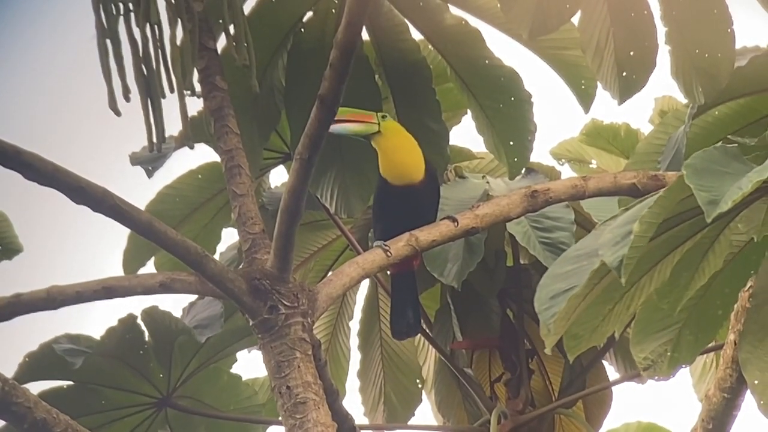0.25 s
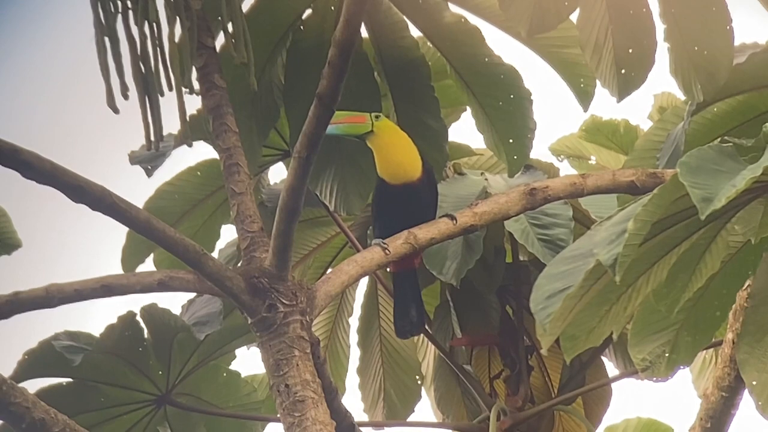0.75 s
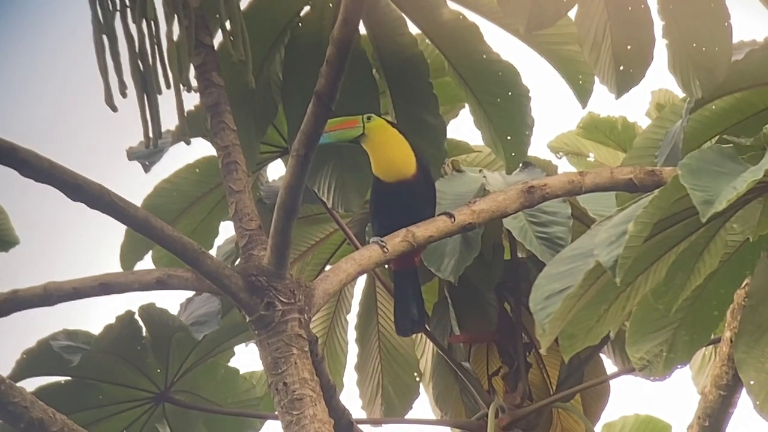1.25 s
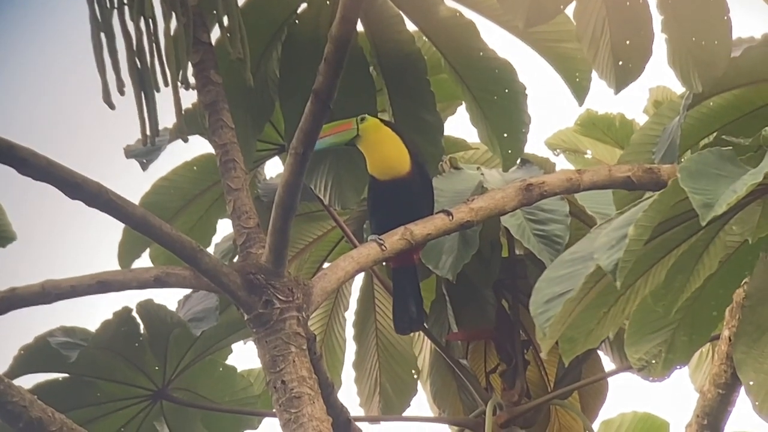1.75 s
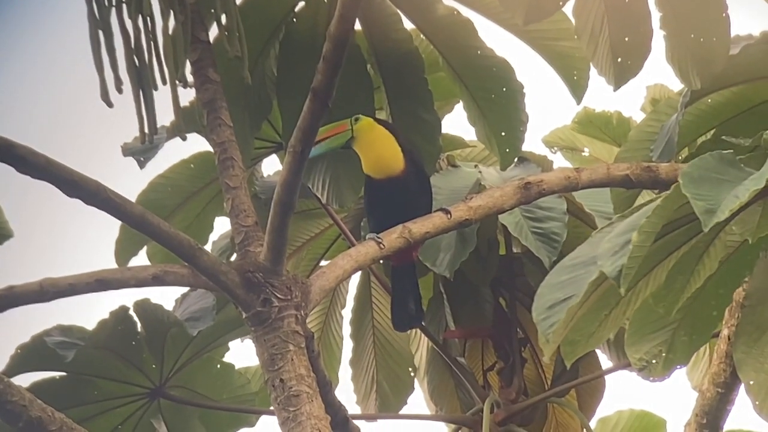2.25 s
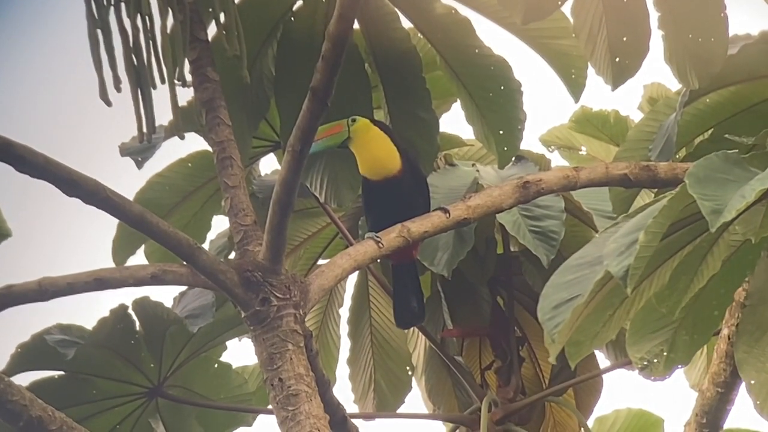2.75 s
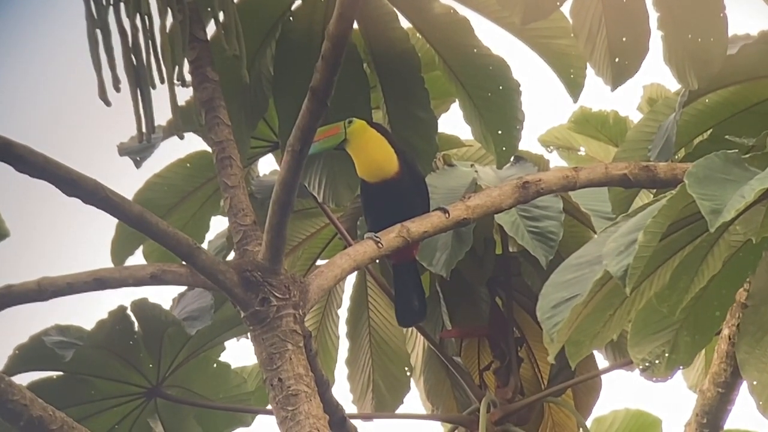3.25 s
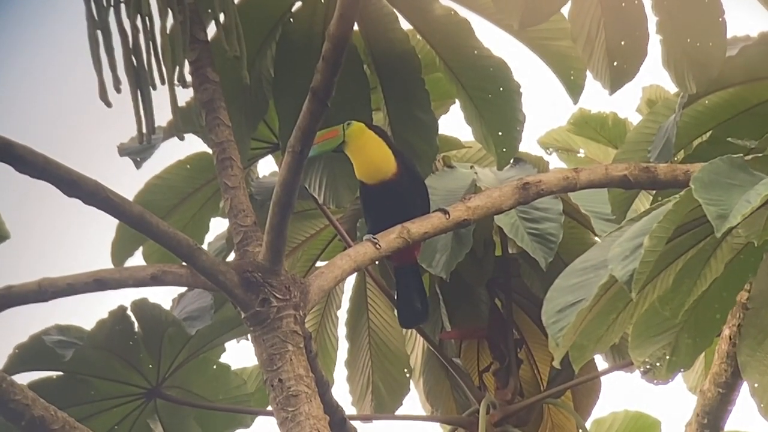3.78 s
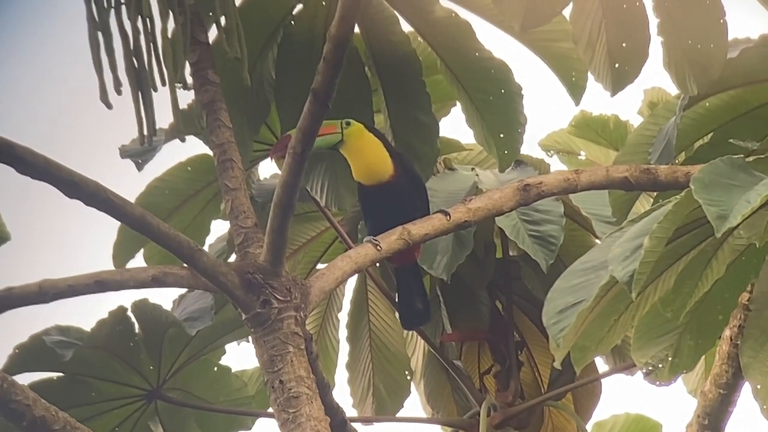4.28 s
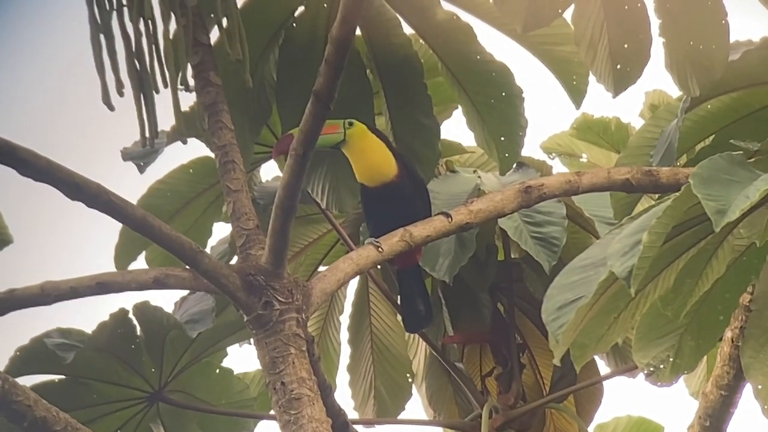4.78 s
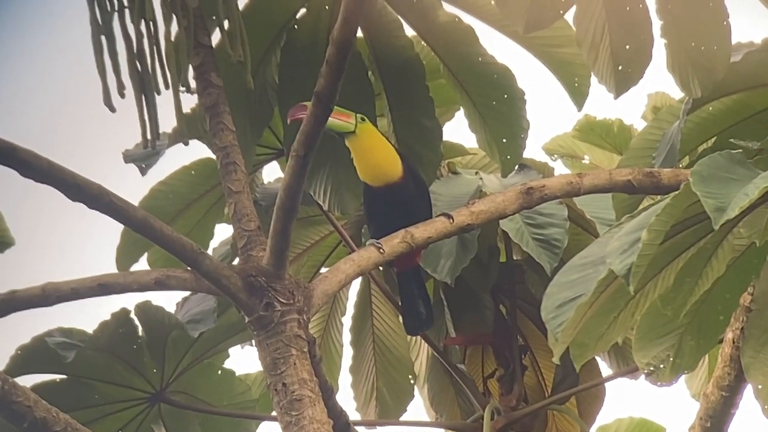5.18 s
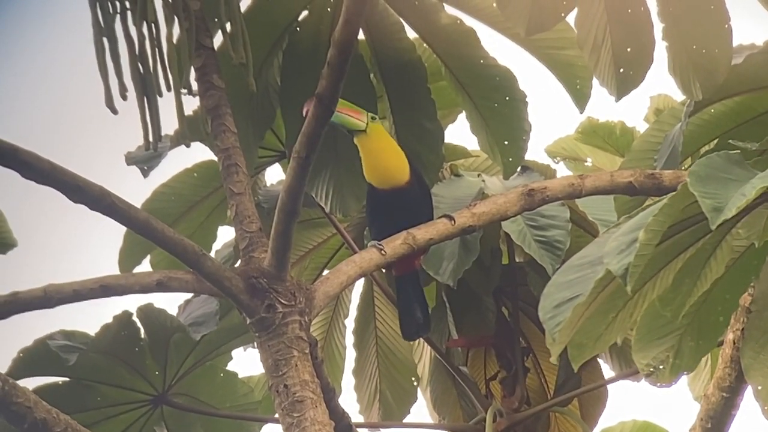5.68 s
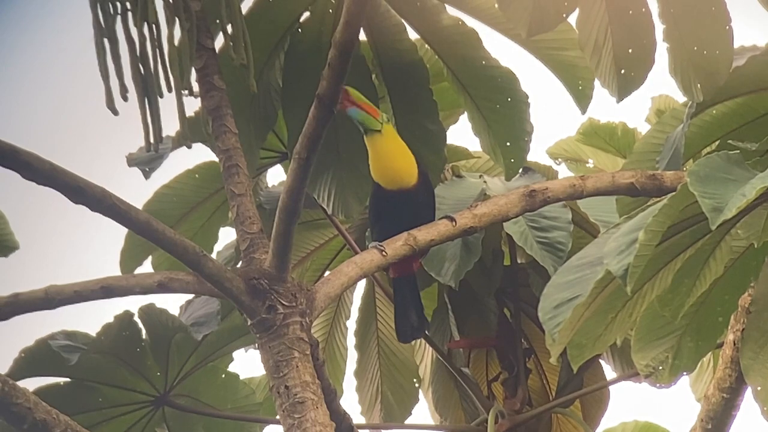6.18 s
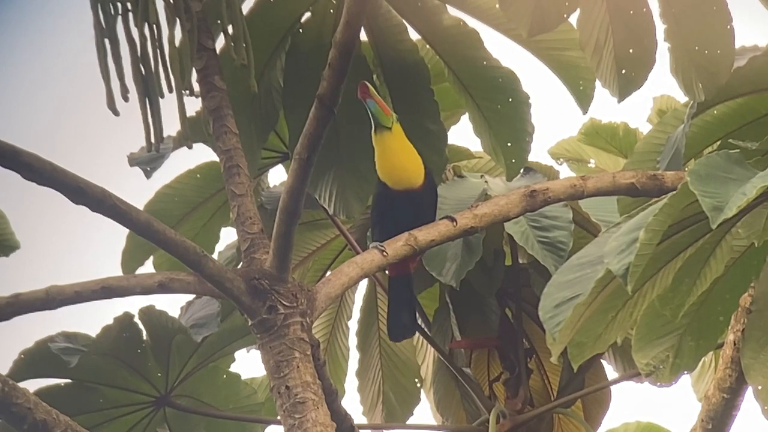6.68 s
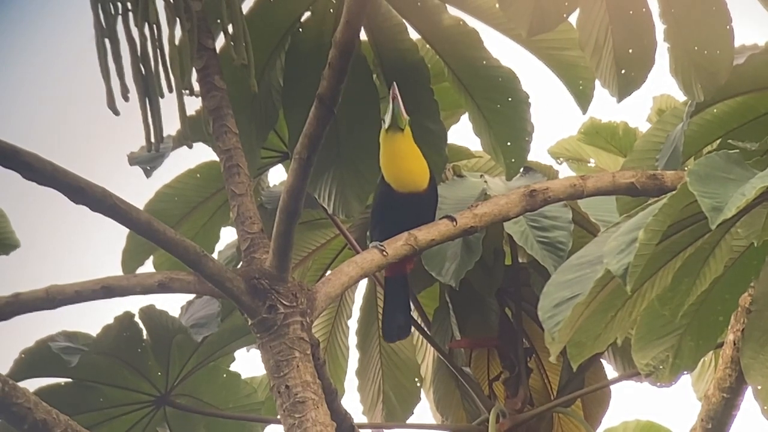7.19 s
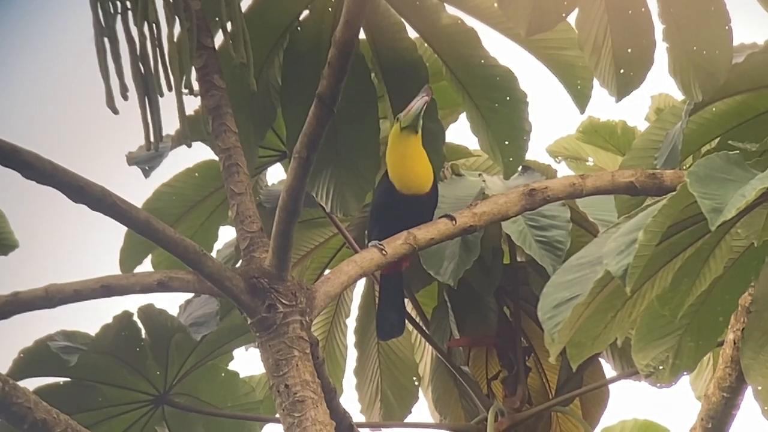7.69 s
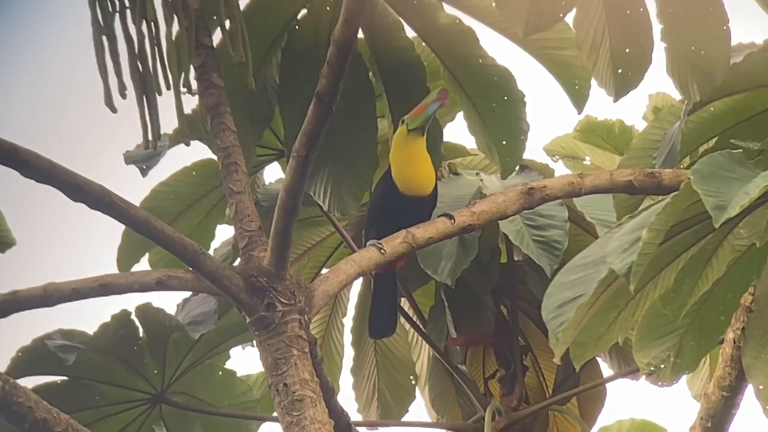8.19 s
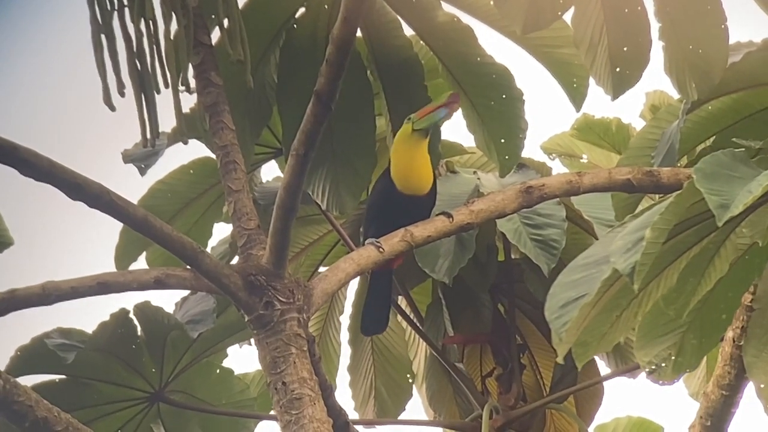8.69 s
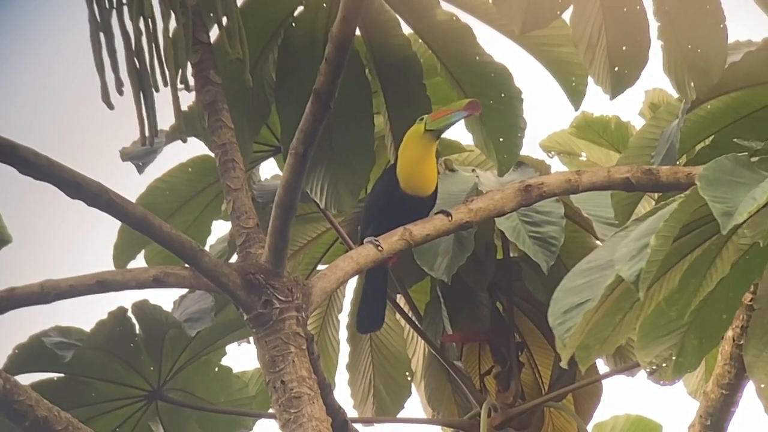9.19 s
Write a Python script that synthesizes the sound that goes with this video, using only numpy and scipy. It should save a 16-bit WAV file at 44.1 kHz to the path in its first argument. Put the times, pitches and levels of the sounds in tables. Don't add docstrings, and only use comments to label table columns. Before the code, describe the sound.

Outdoors in rainforest, a constant grainy insect hiss surrounds a regular series of dry, throaty bird croaks, each a quick burst of pulses. A second, deeper bird replies, blurred by distance, then falls silent in the last few seconds. Very high katydid chirps shimmer wide in the stereo image. Wind thuds gently on the handheld microphone, with small knocks mid-way, faint leaf brushes later and one tiny rising whistle near the end.

```python
import sys
import numpy as np
from scipy import signal
from scipy.fft import rfft, irfft, next_fast_len
from scipy.io import wavfile
from scipy.ndimage import uniform_filter1d

SR = 44100
rng = np.random.default_rng(int(sys.argv[2]) if len(sys.argv) > 2 else 0)


def pcm_store(signal):
    levels = np.round(np.clip(np.atleast_2d(signal), -1, 1) * 32767)
    wavfile.write(sys.argv[1], SR, levels.astype(np.int16).T)


def nominal_scale(level):
    x = np.asarray(level, float) / 20
    return 10 ** x


N = 416304

# frequency in Hz, density in dB per Hz.
HISS_MID = [(88, -11), (160, -9), (340, -11), (700, -14), (1200, -18), (2510, 2.5), (3690, -22.5),
            (5240, -25.5), (6840, -14), (7250, -24), (7450, -35), (9400, -43.5), (12300, -62.5),
            (12900, -65.5)]
# frequency in Hz, density in dB per Hz.
HISS_SIDE = [(88, -35), (150, -4.5), (590, -0.5), (1470, 0), (1960, -6), (2970, -15.5), (3400, -21),
             (4200, -53), (7300, -35), (8100, -23.5), (9700, -27.5), (11000, -51.5), (13700, -33.5),
             (14600, -64)]
# time in seconds, level in dB.
CHORUS = [(0, 0.5), (1.5, 0.5), (3, 1.5), (4.5, 0.5), (6, 1), (7.5, 0.5), (9.44, 0)]
# pitch in Hz, width in Hz, level in dB, chirps per second.
CRICKETS = [
    (6850, 95, -71.5, 45),
    (6520, 80, -77.5, 36),
    (7360, 66, -90.5, 19),
]
# start in seconds, length in seconds, first level in dB, last level in dB.
KATYDID = [
    (-.01, 2.64, -57, -54),
    (3.191, 1.343, -57, -56),
    (4.905, 1.008, -55, -53),
    (6.714, 0, -58, -58),
    (7.224, 1.701, -52, -50),
    (9.306, 0, -55, -55),
]
# time in seconds, level in dB.
GUSTS = [(0, -70), (.63, -67), (.9, -56), (1.5, -58), (2.3, -52), (2.52, -46.5), (2.73, -59.5),
         (3.36, -54.5), (3.8, -63.5), (4.6, -53), (5.6, -60), (6.3, -54), (6.72, -44), (7, -54),
         (7.35, -49), (7.85, -58), (9.03, -51), (9.44, -56.5)]
# time in seconds, peak in dB, pitch in Hz.
PUFFS = [(1.943, -39.5, 69), (2.098, -41, 92), (2.412, -34, 110), (2.452, -28.5, 73), (5.062, -41, 68.6),
         (6.282, -34, 64.6), (6.538, -34.5, 80.7), (6.595, -28.5, 77), (6.769, -37, 48.4), (6.813, -28, 70),
         (7.191, -36.5, 56.5), (7.691, -26.5, 61.3), (8.588, -35.5, 70)]
# start in seconds, peak in dB, opening pitch in Hz, swell in dB.
CROAKS = [(0.3025, -28, 1852, 14), (0.9638, -29, 1820, 5), (1.6238, -29.5, 1800, 5),
          (2.2893, -31.5, 1840, 3.5), (2.9503, -28.5, 1890, 9), (3.6037, -29.5, 1865, 8),
          (4.2369, -27, 1840, 10.5), (4.9385, -29, 1843, 7.5), (5.5665, -28.5, 1834, 8),
          (6.1937, -29, 1822, 7.5), (6.7965, -28.5, 1842, 5.5), (7.4257, -26.5, 1875, 10),
          (8.0381, -26, 1794, 9), (8.7234, -26, 1810, 11), (9.35, -25, 1783, 12)]
# length in seconds, slow gaps, quick gaps, index of the gap that stumbles, beats lost there.
RHYTHM = [(.0926, 2, 5, 0, 0), (.117, 5, 1, 0, 0), (.1225, 5, 0, 0, 2), (.123, 4, 3, 0, 1),
          (.113, 3, 5, 0, 0), (.1112, 3, 4, 2, 1), (.122, 5, 1, 1, 1), (.111, 5, 1, 0, 0),
          (.1235, 4, 3, 0, 1), (.1133, 5, 1, 0, 0), (.132, 3, 7, 0, 0), (.1117, 3, 5, 0, 0),
          (.1222, 5, 2, 0, 0), (.1237, 3, 4, 0, 2), (.125, 5, 2, 0, 0)]
# time in seconds, octave in dB re peak, bill ring in dB re peak.
HEAD_TURNS = [(0.3, -17, -13.5), (1.0, -14.5, -16.5), (3.6, -15.5, -21), (4.4, -15, -21), (5.6, -16, -12),
              (6.8, -18.5, -14.5), (7.501, -23.5, -16), (9.4, -24, -13.5)]
# time of the loudest pulse in seconds, peak in dB, gap between pulses in seconds,
# swell in dB, after-beat step in dB.
FAR_CALLS = [(0.5064, -28, .0185, 8, -6), (1.1776, -27.5, .0195, 6, -17), (1.8152, -29.5, .013, 2.5, -15),
             (2.507, -33, .019, 3, -4), (3.2166, -27.5, .0228, 6.5, -20), (3.914, -33, .025, 6.5, -4),
             (4.6549, -25, .017, 9, -3), (5.3611, -24, .0215, 8, -20), (6.0586, -31.5, .022, .5, -20),
             (6.767, -28, .025, 6, -20)]
# time in seconds, peak in dB, pitch in Hz.
KNOCKS = [(4.267, -49.5, 149), (4.331, -49, 230), (4.417, -46, 153), (4.435, -48, 315), (4.471, -42, 477),
          (4.479, -38, 146), (4.519, -56, 380), (4.557, -47.5, 496), (5.339, -43, 178), (6.124, -47, 197),
          (6.539, -41.5, 159), (6.604, -44, 160), (6.847, -45.5, 150), (7.271, -43.5, 237),
          (8.399, -47, 175), (8.928, -42.5, 152)]
# time in seconds, level in dB, length in seconds.
RUSTLES = [
    (6.127, -77.5, 0.052),
    (6.888, -75.5, 0.018),
    (7.502, -83.5, 0.059),
    (8.808, -77.5, 0.046),
]
# time in seconds, pitch in Hz, level in dB.
WHISTLE = [
    (8.768, 7300, -72),
    (8.776, 7100, -60),
    (8.79, 7050, -60),
    (8.803, 7600, -61),
    (8.813, 8150, -64),
    (8.818, 8400, -80),
]


def bell(x, centre, rise, fall):
    width = np.where(x < centre, rise, fall)
    return np.exp(-.5 * ((x - centre) / width) ** 2)


def level(x, db):
    return x * nominal_scale(db) / np.sqrt(np.mean(x ** 2))


def track(table):
    s, *columns = np.transpose(table)
    return [np.interp(np.arange(N) / SR, s, column) for column in columns]


def shape(x, gain):
    size = next_fast_len(N)
    hz = np.arange(size // 2 + 1) * SR / size + 1
    return irfft(rfft(x, size) * gain(hz), size)[:N]


def band(x, hz, width_hz):
    return shape(x, lambda f: bell(f, hz, width_hz, width_hz))


def noise_band(hz, width_hz):
    return band(rng.standard_normal(N), hz, width_hz)


def walk(rate):
    hold = int(SR / rate)
    steps = np.repeat(rng.standard_normal(N // hold + 1), hold)
    return 1.65 * uniform_filter1d(uniform_filter1d(steps, hold), hold)[:N]


def bursts(s, db, hz, rise, fall, glide, span=0.032):
    t = np.arange(-int(span * SR), int(span * SR)) / SR
    phase = 2 * np.pi * (hz[:, None] * (t + 500 * glide * t ** 2) + rng.random((len(s), 1)))
    envelope = bell(t, 0, np.reshape(rise, (-1, 1)), np.reshape(fall, (-1, 1)))
    wave = nominal_scale(db)[:, None] * envelope * np.sin(phase)
    place = np.round(s * SR).astype(int)[:, None] + np.arange(len(t)) - len(t) // 2
    inside = (place >= 0) & (place < N)
    return np.bincount(place[inside], wave[inside], N)


def foliage(x, t60, gap, echoes_per_s):
    t = np.arange(SR) / SR
    hits = (rng.random(SR) < echoes_per_s / SR) * (t > gap)
    echoes = rng.standard_normal(SR) * hits * np.exp(-np.log(1000) * t / t60)
    return signal.fftconvolve(x, echoes / np.sqrt(np.sum(echoes ** 2)))[:N]


def hiss(spectrum, db):
    hz, per_hz_db = np.transpose(spectrum)
    clicks_per_s = 2500
    clicks = nominal_scale(2.5 * rng.exponential(size=N)) * (rng.random(N) < clicks_per_s / SR)
    noise = rng.standard_normal(N) * (1 + 0.73 * clicks)
    out = 0
    for centre_hz in 120 * 2 ** np.arange(0, 7.3, 1 / 3):
        third = shape(noise, lambda f: bell(np.log2(f / centre_hz), 0, 1 / 6, 1 / 6))
        flicker_db = 1.32 * walk(12) + 0.9 * walk(1.4)
        out = out + third * nominal_scale(flicker_db)
    return level(shape(out, lambda f: nominal_scale(np.interp(np.log(f), np.log(hz), per_hz_db))), db)


def crickets():
    out = 0
    for hz, width_hz, db, chirps_per_s in CRICKETS:
        throb = nominal_scale(4.1 * walk(chirps_per_s))
        out = out + level(noise_band(hz, width_hz) * throb, db)
    return out


def katydid():
    gap_s = .335
    bouts = []
    for start, length, first_db, last_db in KATYDID:
        count = round(length / gap_s) + 1
        bouts.append(np.linspace((start, first_db), (start + length, last_db), count).T)
    s, db = np.hstack(bouts)
    db_chance, hz_chance = rng.standard_normal((2, len(s)))
    chirps = bursts(s + .02, db - 4.5 + 1.5 * db_chance, 8980 + 80 * hz_chance, .009, .014, .0011)
    bed = level(noise_band(8940, 330), -78)
    return chirps + nominal_scale(-1) * foliage(chirps, 0.62, .01, 2000) + bed


def wind():
    gust = nominal_scale(track(GUSTS)[0])
    rumble = level(noise_band(77, 33) * nominal_scale(2.04 * walk(15)), 0.18)
    flutter = level(noise_band(140, 65) * nominal_scale(2 * walk(24)), -35.5)
    s, db, hz = np.transpose(PUFFS)
    puffs = bursts(s + 0.0209, db + 0.5, hz, 0.32 / hz, 0.98 / hz, -0.0011, span=.06)
    return gust * rumble + np.sqrt(gust) * flutter + puffs


def croak(s, db, hz, swell_db, length, slow, quick, stumble, lost):
    gap = np.arange(slow + quick)
    beats = np.repeat([2., 1.], [slow, quick]) + lost * (gap == stumble)
    beats = beats + .17 * np.exp(-gap[::-1] / 1.2)
    along = np.append(0, np.cumsum(beats)) / np.sum(beats)
    late = np.arange(slow + quick + 1) - slow
    offbeat_db = -6 * np.exp(-np.abs(late - 1) / 2.5) * (late > 0) * (late % 2)
    effort_db = -2.5 * (along >= 1) - swell_db * np.clip(1 - along, 0, 1) ** 2.4
    pitch_hz = hz * (1 + .155 * along ** 3)
    return s + length * along, db + effort_db + offbeat_db, pitch_hz, along


def near_pulses():
    s, db, hz, along = np.hstack([croak(*row, *rhythm) for row, rhythm in zip(CROAKS, RHYTHM)])
    bill_chance, db_chance, hz_chance = rng.standard_normal((3, len(s)))
    turn_s, octave_db, bill_db = np.transpose(HEAD_TURNS)
    octave_db = np.interp(s, turn_s, octave_db) - 5 * along
    bill_db = np.interp(s, turn_s, bill_db) - 8 * bell(along, 0.44, 0.23, .2) + 3.5 * bill_chance
    return s, db + 1.3 * db_chance, hz * (1 + .028 * hz_chance), octave_db, bill_db


def near_bird():
    s, db, hz, octave_db, bill_db = near_pulses()
    time_chance, after_chance, bill_chance, octave_chance = rng.standard_normal((4, len(s)))
    voice = bursts(s, db + .5, hz, 0.0014, 0.001, 0.019) * nominal_scale(0.66 * walk(1000))
    after_s, after_db = s + .0048 + 0.00066 * time_chance, db - 5 + 0.83 * after_chance
    after = bursts(after_s, after_db, 0.951 * hz, 0.0017, 0.0025, 0.019)
    octave = bursts(s, db + octave_db + octave_chance, 1.7 * hz + 680, .0012, .0014, .012)
    octave = shape(octave * nominal_scale(4.4 * walk(900)), lambda f: 0.82 + 0.48 * bell(f, 3920, 290, 170))
    bill = bursts(s + .0021, db + bill_db - 1.5, 6090 + 90 * bill_chance, .001, .0014, .013)
    upper = octave + bill * nominal_scale(2.5 * walk(900))
    snap = band(np.abs(voice) * rng.standard_normal(N), 4100, 2000) * nominal_scale(-18.5)
    scattered = nominal_scale(-8) * foliage(upper, .24, .003, 2500)
    sizzle = band(np.abs(bill) * rng.standard_normal(N), 14000, 900) * nominal_scale(-28)
    return voice + after + snap + sizzle + upper + scattered


def far_pulses():
    s, db, gap, swell_db, trail_db = np.transpose(FAR_CALLS)[:, :, None]
    lead, trail = np.array([3, 2, 1, 0, 0, 0]), np.array([0, 0, 0, 0, 1, 2])
    chance = rng.standard_normal((len(FAR_CALLS), 2, len(lead)))
    s = s - gap * lead + .013 * trail + .001 * chance[:, 0] * (lead > 0)
    db = db - swell_db * np.sqrt(lead) + trail_db * trail
    hz = 1620 - 65 * (lead / lead.max()) ** 2 + 25 * chance[:, 1] + 50 * trail
    return s.ravel(), db.ravel(), hz.ravel()


def far_bird():
    s, db, hz = far_pulses()
    voice = bursts(s, db, hz, .0045, .003, .003) * nominal_scale(2 * walk(400))
    breath = np.abs(uniform_filter1d(np.abs(voice), size=300)) ** 0.91 * nominal_scale(2.4 * walk(300))
    rasp = band(np.roll(breath, 150) * rng.standard_normal(N), 2440, 620) * nominal_scale(2.5)
    crack = bursts(s[3::6], db[3::6] - 13, 1.62 * hz[3::6], .0008, .0015, .02)
    second = bursts(s, db - 32.5, 2 * hz, .003, 0.003, 0.00076)
    third = bursts(s, db - 31.5, 3 * hz, 0.0028, 0.0035, .001)
    return voice + rasp + crack + second + third


def knocks():
    s, db, hz = np.transpose(KNOCKS)
    thuds = bursts(s + 0.01, db, hz, 0.52 / hz, 1.32 / hz, -.002)
    ringing = foliage(np.abs(thuds), 0.16, 0, 9000)
    rattle = band(ringing * rng.standard_normal(N), 230, 160) * nominal_scale(13.5)
    return thuds + rattle


def rustles():
    t = np.arange(N) / SR
    swell = sum(nominal_scale(db) * bell(t, s, length, 1.8 * length) for s, db, length in RUSTLES)
    return swell * level(noise_band(8950, 910), 0)


def whistle():
    before = [(0, 7250, -150), (WHISTLE[0][0] - .01, 7250, -150)]
    after = [(WHISTLE[-1][0] + .01, 8500, -150)]
    hz, db = track(before + list(WHISTLE) + after)
    return nominal_scale(db) * np.sin(2 * np.pi * np.cumsum(hz) / SR)


def scene():
    near, far = near_bird(), far_bird()
    birds = near + nominal_scale(-8.5) * foliage(near, .42, 0.013, 3500)
    birds = birds + nominal_scale(-5) * far + nominal_scale(-10.5) * foliage(far, .26, .004, 3900)
    chorus = nominal_scale(track(CHORUS)[0])
    high = katydid()
    mid = birds + chorus * (hiss(HISS_MID, -49) + crickets()) + whistle() + rustles()
    mid = mid + wind() + knocks() + nominal_scale(-24) * high
    lead = shape(birds, lambda f: (1j * 0.57 + .04) * bell(f, 1500, 400, 420))
    scatter = band(foliage(birds, 0.47, .002, 3000), 1500, 450) * nominal_scale(-15)
    buffeting = nominal_scale(-14.5) * np.roll(wind() + knocks(), 300)
    side = lead + scatter + hiss(HISS_SIDE, -59.5) + high + 1.5 * rustles()
    side = side + buffeting + 0.17 * band(mid, 390, 210)
    return np.array([mid + side, mid - side])


def top_cut(x):
    return signal.sosfilt(signal.butter(12, 15300, fs=SR, output="sos"), x)


def record(dry):
    return top_cut(dry)


dry = scene()
out = record(dry)
pcm_store(out)
```